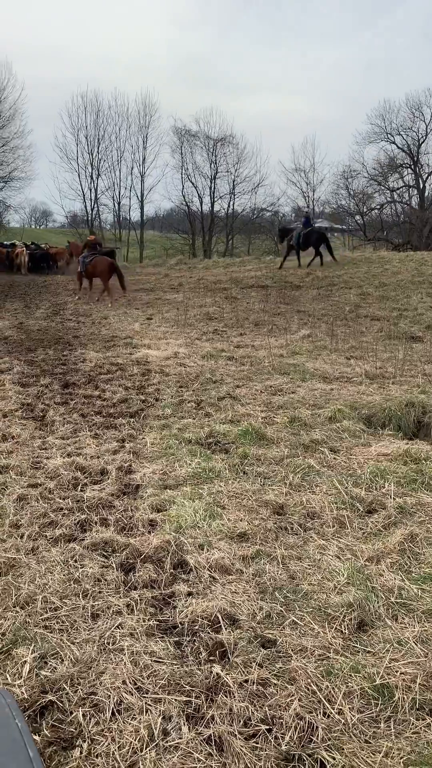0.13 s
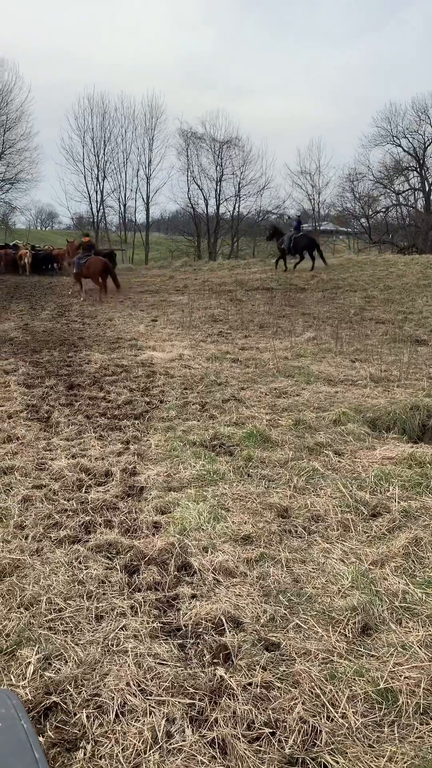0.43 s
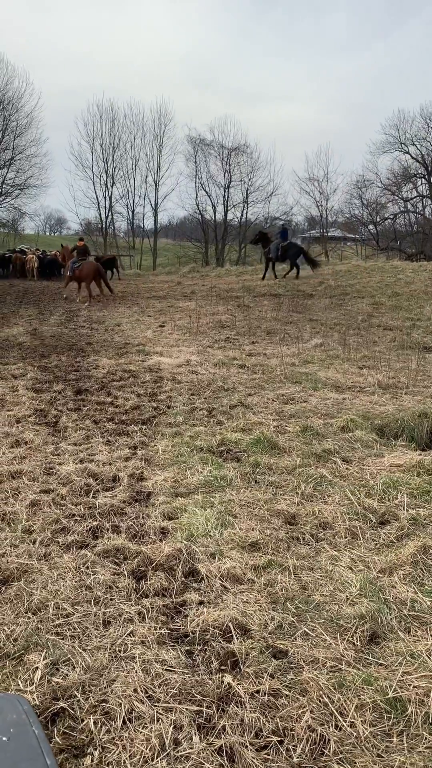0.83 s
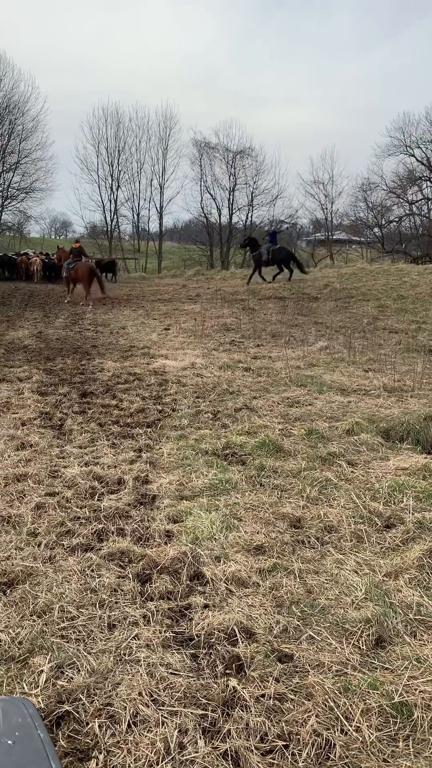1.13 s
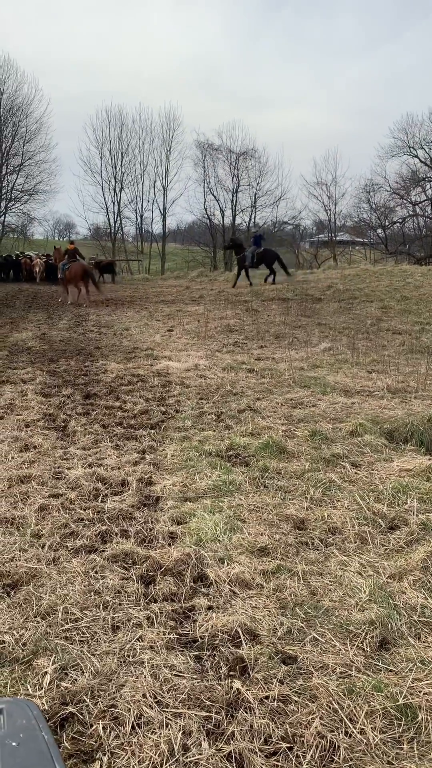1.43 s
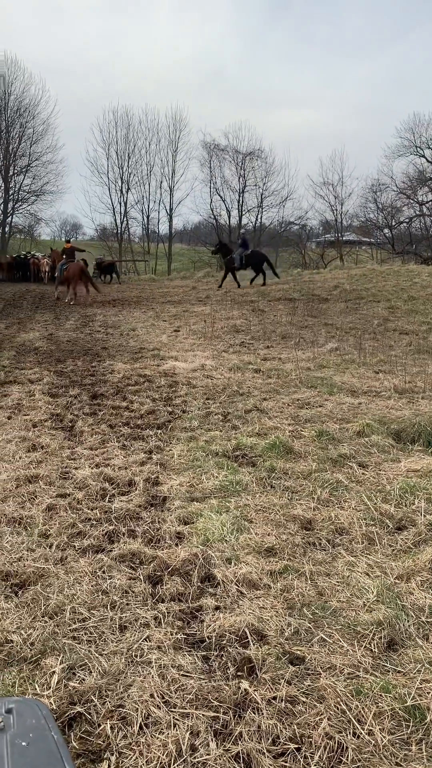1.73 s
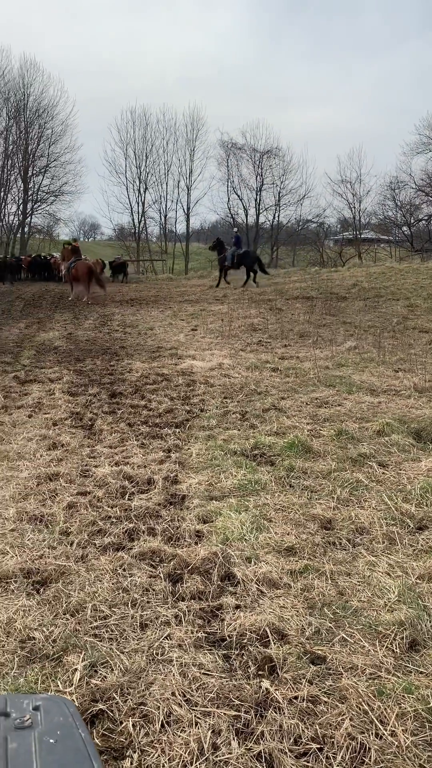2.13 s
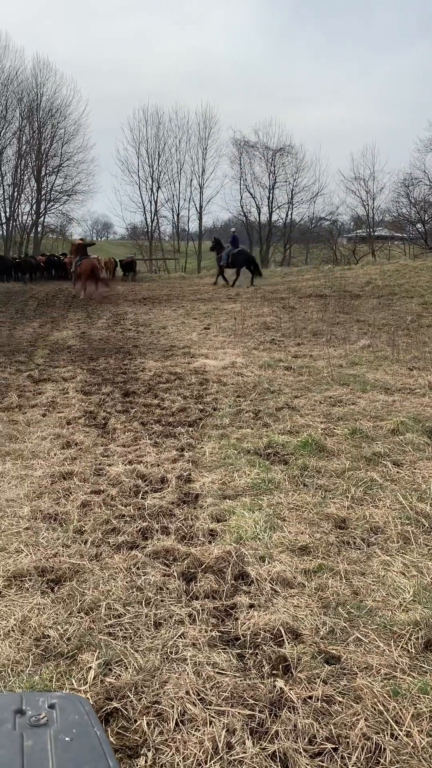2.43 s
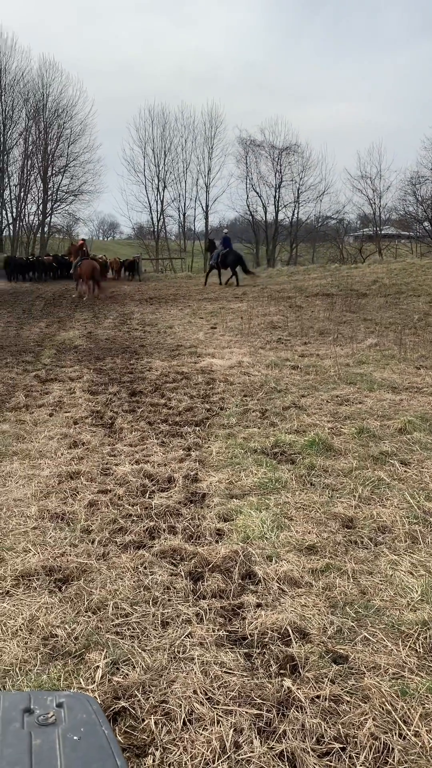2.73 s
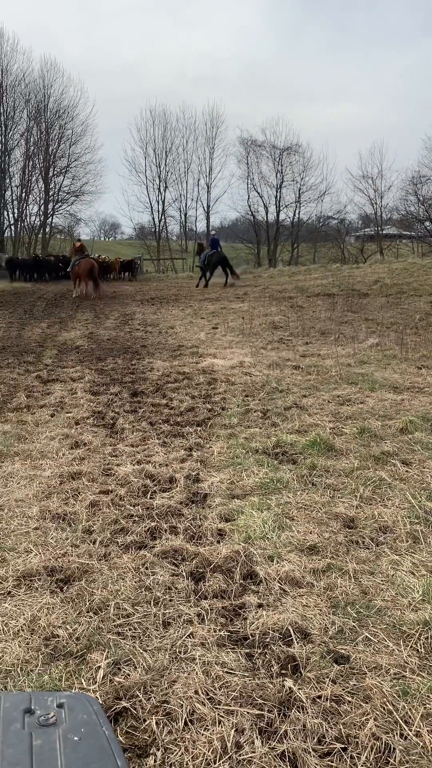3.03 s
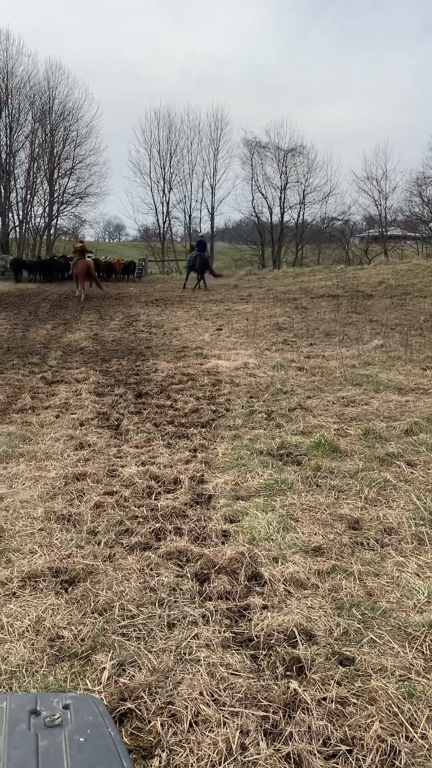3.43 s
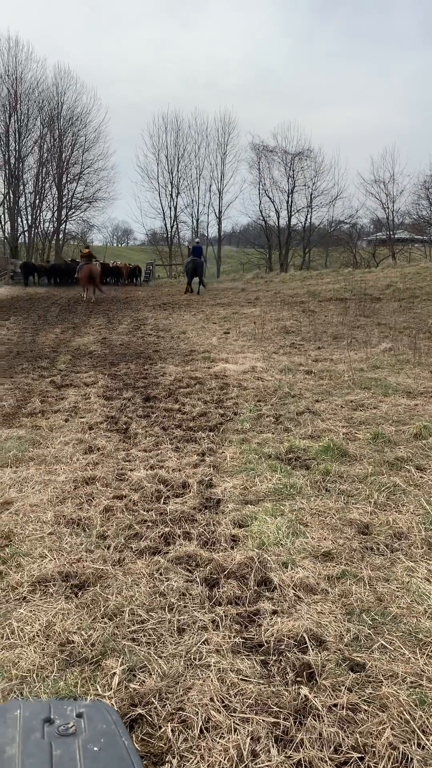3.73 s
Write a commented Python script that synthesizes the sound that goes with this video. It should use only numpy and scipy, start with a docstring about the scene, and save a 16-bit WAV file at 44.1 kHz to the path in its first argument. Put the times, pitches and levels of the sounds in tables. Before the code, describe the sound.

A long whip cracks twice in an open pasture, heard from some way off. Faint swishes at about 0.5 and 0.9 seconds lead to the first crack at 1.1 seconds. A sharper, brighter crack follows at 2.6 seconds. Each slaps back and rolls briefly off the trees. Faint swishes return after 3.4 seconds. Low wind rumble on the microphone, soft dry grass rustles and a faint hiss lie underneath.

```python
"""Whip cracks across a pasture

A long whip whistles through the air and cracks twice, heard from a phone some way off. Each crack is
a shock wave scattered by rough grass; it slaps back from near and far and rolls back from the tree
line. Underneath: ticks and rustles in dry grass, wind rumble on the microphone, hiss and a far hum."""
import sys
import numpy as np
from scipy import signal
from scipy.fft import rfft, irfft
from scipy.io import wavfile
from scipy.ndimage import uniform_filter1d

SR = 44100
rng = np.random.default_rng(int(sys.argv[2]) if len(sys.argv) > 2 else 0)


def to_wav(sig):
    """Store sig (one row per channel, or 1-D mono) as 16-bit WAV at the path in sys.argv[1].

    Samples outside -1..1 are clipped; the rate is SR.
    """
    pcm = np.clip(np.atleast_2d(sig), -1, 1) * 32767
    pcm = np.round(pcm).astype(np.int16)
    wavfile.write(sys.argv[1], SR, pcm.T)  # frames by channels


N = 171990
TIME, FREQ = np.arange(N) / SR, np.arange(N // 2 + 1) * SR / N

# The two hits. Each row: start in seconds, shock and scatter levels in dB, scatter hold and decay in
# seconds, bass and treble shelves in dB, bounce lag in seconds.
WHIP_CRACKS = [(1.0649, -35, -26, 0.0049, 0.0072, -0.5, -1.5, 0.00282),
               (2.6004, -13.5, -27.5, 0.0016, 0.0034, -2.5, 9, 0.0038)]
# Lighter snaps as the lash unrolls. Each row: start in seconds, level in dB, decay in seconds,
# treble shelf in dB.
LASH_SNAPS = [(1.041, -56.5, 0.036, 4), (2.562, -44.5, 0.0097, 3), (2.5798, -37.5, 0.0042, 17),
              (2.587, -38.5, 0.03, 0)]
# Weight under the cracks. Each row: start in seconds, level in dB, rise in seconds, pitch in Hz.
AIR_THUMPS = [(1.066, -34, 0.0031, 212), (2.561, -39, .008, 127)]
# The lash whistling. Each row: start and length in seconds, level in dB, first, middle, last pitch in Hz.
LASH_SWISHES = [(0.476, 0.033, -56.5, 1220, 1500, 1520), (0.494, 0.063, -54, 1490, 1268, 1210),
                (0.863, 0.088, -61.5, 973, 1106, 1090), (0.928, 0.17, -64.5, 921, 954, 960),
                (2.421, 0.033, -58, 1580, 1636, 1480), (3.398, 0.073, -66.5, 1230, 1446, 1800),
                (3.787, 0.1, -65, 1425, 1380, 1420)]
# Separate echoes, near and far. Each row: start in seconds, shock and scatter levels in dB,
# scatter hold and decay in seconds, treble shelf in dB.
SLAP_ECHOES = [(1.1001, -35, -28, 0.00093, 0.0027, -3), (1.108, -31, -28.5, 0.0057, 0.017, -2.5),
               (1.1748, -28, -25.5, 0.0013, 0.0056, -5.5), (1.2, -30, -34, 0.0039, 0.0027, -16),
               (1.2154, -19, -34, 0.004, 0.0026, -24), (2.635, -47, -37, 0.011, 0.014, 1.5),
               (1.558, -42, -54.5, 0.017, 0.049, -42), (2.6416, -19, -27.5, 0.00063, 0.0012, 2.5),
               (2.689, -53, -39, 0.02, 0.003, 1.5), (2.7613, -22, -37.5, 0.017, 0.01, -45),
               (2.85, -53, -45.5, 0.0072, 0.0073, -28)]
# One rolling echo per crack. Each row: start in seconds, level in dB, rise and hold in seconds,
# treble shelf in dB.
TREE_ECHOES = [(1.135, -34.5, 0.08, 0.014, -7.5), (2.673, -41, 0.024, 0.06, 3)]
# The tail among the trees. Each row: frequency in Hz, seconds to fall by 60 dB.
TREE_DECAY = [(300, 0.86), (1400, 0.84), (3500, 0.59), (7000, 0.53), (13000, 0.061)]
# Close ticks and rustles. Each row: start in seconds, level in dB, decay in seconds, centre in Hz.
STALK_TICKS = [(0.07, -45.5, 0.0013, 3500), (0.103, -66, 0.081, 7000), (0.53, -51.5, 0.0032, 1970),
               (0.532, -72.5, 0.082, 8200), (.559, -56, 0.0017, 2960), (2.457, -51.5, 0.0021, 3500),
               (3.325, -55, 0.0027, 730), (3.448, -65.5, 0.018, 3500), (3.706, -59.5, 0.013, 4040)]
# EQ curves of the layers. Each row: frequency in Hz, relative level in dB.
CRACK_EQ = [(60, -28), (130, 2.5), (230, -8.5), (450, -5.5), (1000, -4), (1450, 3), (2300, -7.5),
            (4100, -1.5), (5500, -13), (7500, -15), (11000, -26.5), (14000, -25.5)]
ECHO_EQ = [(100, -12), (350, -22), (650, -5), (950, -6.5), (1400, 4), (2300, 2.5), (4100, 2.5), (5500, -8),
           (7500, -4.5), (9700, -20), (12000, -15), (14500, -29)]
GRASS_EQ = [(400, -16.5), (1000, 13.5), (1700, 12.5), (4000, 3), (7500, -8), (13000, -25.5)]
WIND_EQ = [(20, -21.5), (35, -9.5), (60, 3), (90, -3.5), (140, -11), (350, -32.5), (2000, -89.5)]
HISS_EQ = [(100, -10), (300, 8.5), (560, 14), (750, 6), (1100, -13), (1600, -32.5), (4000, -15.5),
           (5200, -33.5), (6600, -3), (8500, -24), (13000, -16.5), (15000, -36.5)]
# Fader rides of the beds. Each row: time in seconds, level in dB.
GRASS_FADER = [(0, -76.5), (.4, -79.5), (.58, -72), (.8, -78), (1.6, -70.5), (1.95, -67.5), (2.15, -72),
               (2.5, -68.5), (3.15, -66), (3.38, -75.5), (3.6, -66.5), (3.76, -71.5), (3.9, -67)]
WIND_FADER = [(0, -53), (.14, -48), (.3, -51), (.52, -49), (.82, -50), (.95, -55), (1.2, -52), (1.8, -54),
              (1.93, -47), (2.2, -50), (2.36, -48), (2.41, -40), (2.46, -51), (3.15, -55), (3.7, -53),
              (3.85, -45), (3.9, -49)]
HUM_FADER = [(0, -77.5), (2.9, -71), (3.2, -64), (3.7, -70.5)]
# The phone's two microphone ports. Each row: frequency in Hz, lag of the right in radians,
# unrelated share from 0 to 1, sensitivity to direction from 0 to 1.
MIC_PORTS = [(280, 0, .002, .01), (650, .05, .2, .7), (1500, .15, .08, .6), (2500, .9, .4, 1),
             (4200, 1.0, .42, 1), (5100, 3.2, .48, .8), (6000, 5.4, .33, .1), (6900, 6.3, .04, 0),
             (7600, 6.6, .15, 0), (9700, 9.4, .05, 0), (11000, 11.0, .45, 0), (12300, 12.6, .1, 0),
             (13600, 13.2, .5, 0)]
LAG, UNRELATED, DIRECTION = 1, 2, 3  # its columns

SHOCK_S, ATTACK_S = .0002, .0007
BOUNCE_DB, BOUNCE_HZ = -8, 3500
WASH_DB, WASH_DECAY_S = -10, 0.044
TRUNKS_PER_S, TRUNK_DB = 500, -5
TREE_FLUTTER_DB, CLUMP_DB = -1.2, 1.5
TWIG_SPREAD_DB, STALK_SPREAD_DB = 2, 2.4
SWISH_WIDTH_HZ = 240
HISS_DB, HUM_HZ, HUM_WIDTH_HZ = -69, 549, 73
CRACK_PAN_DB, ECHO_PAN_DB = -5, -2  # negative leans right
BASS_HZ, TREBLE_HZ, TOP_HZ = 500, 4860, 14200


def whip():
    """The tip breaks the sound barrier; the ground smears the shock into a short burst and a weak wash."""
    out = 0
    for start, shock_db, db, hold, decay, bass_db, treble_db, lag in WHIP_CRACKS:
        burst = shock(start, shock_db) + amp(db) * envelope(start, hold, decay) * grains()
        wash = amp(db + WASH_DB) * envelope(start, 0, WASH_DECAY_S) * grains(TWIG_SPREAD_DB)
        out += colour(bounce(burst, lag), CRACK_EQ, bass_db, treble_db)
        out += colour(wash, ECHO_EQ, 0, treble_db)
    for start, db, decay, treble_db in LASH_SNAPS:
        snap = amp(db) * envelope(start, 0, decay) * grains()
        out += colour(snap, CRACK_EQ, 0, treble_db)
    return pan(out, CRACK_PAN_DB)


def shock(start, db):
    """The hard front of a crack: an N-shaped pressure wave."""
    ramp = 2 * (TIME - start) / SHOCK_S - 1
    gate = np.clip((1 - abs(ramp)) * SHOCK_S * SR / 2 + .5, 0, 1)
    return -ramp * gate * amp(db)


def bounce(x, lag):
    """A second, duller path a few milliseconds longer makes the sound hollow."""
    late_path = amp(BOUNCE_DB) * np.exp(-2j * np.pi * FREQ * lag) / (1 + (FREQ / BOUNCE_HZ) ** 2)
    return irfft(rfft(x) * (1 + late_path), N)


def thumps():
    """The lash shoves the air aside with a short low thud."""
    out = 0
    for start, db, rise, hz in AIR_THUMPS:
        age = np.maximum(TIME - start, 0)
        punch = amp(db) * age / rise * np.exp(1 - age / rise)
        out += punch * np.sin(2 * np.pi * hz * age)
    return out


def swishes():
    """Air whistles round the lash: a narrow band of noise that glides in pitch."""
    out = 0
    for start, length, db, *pitches in LASH_SWISHES:
        progress = np.clip((TIME - start) / length, 0, 1)
        hz = np.interp(progress, [0, .5, 1], pitches)
        phase = 2 * np.pi * np.cumsum(hz) / SR
        noise = rfft(rng.standard_normal((2, N)))
        eddies = unit(irfft(noise / (1 + (2 * FREQ / SWISH_WIDTH_HZ) ** 2), N))
        whistle = eddies[0] * np.cos(phase) + eddies[1] * np.sin(phase)
        out += amp(db) * np.sin(np.pi * progress) * whistle
    return pan(out, ECHO_PAN_DB)


def slaps():
    """Separate echoes of the crack: quick ones from nearby and later, duller ones from far off."""
    out = 0
    for start, shock_db, db, hold, decay, treble_db in SLAP_ECHOES:
        scatter = amp(db) * envelope(start, hold, decay) * grains(TWIG_SPREAD_DB)
        out += colour(shock(start, shock_db) + scatter, ECHO_EQ, 0, treble_db)
    return pan(out, ECHO_PAN_DB)


def tree_line():
    """Tiny echoes off trunks and twigs arrive in clumps, swell and die away, the treble first."""
    out = 0
    octaves_hz = 250 * 2. ** np.arange(7)
    for (start, db, rise, hold, treble_db), (*_, lag) in zip(TREE_ECHOES, WHIP_CRACKS):
        twigs = grains(TWIG_SPREAD_DB)
        trunks = amp(TRUNK_DB) * grains(per_s=TRUNKS_PER_S)
        wood = unit(bounce(twigs + trunks, lag))
        clumps = amp(TREE_FLUTTER_DB * wander(250) + CLUMP_DB * wander(70))
        echoes = rfft(colour(wood * clumps, ECHO_EQ, 0, treble_db))
        swell = amp(db) * np.clip((TIME - start) / rise, 0, 1)
        age = np.maximum(TIME - start - rise - hold, 0)
        for hz in octaves_hz:
            crossover = on_log(list(zip(octaves_hz, octaves_hz == hz)), FREQ)
            tail = amp(-60 * age / on_log(TREE_DECAY, hz))
            out += irfft(echoes * crossover, N) * swell * tail
    return pan(out, ECHO_PAN_DB)


def grass():
    """Dry stalks rustle and now and then tick."""
    rustle = colour(grains(STALK_SPREAD_DB), GRASS_EQ) * fader(GRASS_FADER, 2 * wander(26))
    ticks = sum(amp(db) * envelope(start, 0, decay) * band(grains(STALK_SPREAD_DB), hz, 0.97 * hz)
                for start, db, decay, hz in STALK_TICKS)
    return rustle + ticks


def background():
    """The bed: wind buffeting both ports alike, a wavering far hum and open-air hiss."""
    buffet_db, waver_db, breeze_db = 1.5 * wander(30), 2 * wander(7), 1.2 * wander(6)
    rumble = colour(rng.standard_normal(N), WIND_EQ) * fader(WIND_FADER, buffet_db)
    hum = band(grains(), HUM_HZ, HUM_WIDTH_HZ) * fader(HUM_FADER, waver_db)
    hiss = colour(grains(), HISS_EQ) * amp(HISS_DB + breeze_db)
    return rumble + hum + hiss


def grains(spread_db=0, per_s=SR):
    """Stereo noise from arrivals of uneven size: alike in the bass, partly unrelated higher up."""
    arrivals = rng.standard_normal((2, N)) * (rng.random(N) < per_s / SR)
    sizes = amp(spread_db * rng.exponential(size=N))
    mid, side = rfft(unit(arrivals * sizes))
    share = ports(UNRELATED) / 2
    return irfft(mid * np.sqrt(1 - share) + side * np.sqrt(share) * np.array([[1], [-1]]), N)


def colour(x, curve, bass_db=0, treble_db=0):
    """An EQ curve scaled to unit power, then a shelf at each end."""
    db = on_log(curve, FREQ)
    db -= 10 * np.log10(np.mean(amp(db) ** 2))
    db += bass_db / (1 + (FREQ / BASS_HZ) ** 4)
    db += treble_db * (1 - 1 / (1 + (FREQ / TREBLE_HZ) ** 4))
    # Minimum phase, so nothing rings ahead of a hit.
    cepstrum = irfft(np.log(amp(db)), N)
    cepstrum[1:N // 2] *= 2
    cepstrum[N // 2 + 1:] = 0
    return irfft(rfft(x) * np.exp(rfft(cepstrum)), N)


def band(x, hz, width_hz):
    """A resonant band-pass, its output at rms 1."""
    detuning = (FREQ ** 2 - hz ** 2) / ((FREQ + 1) * width_hz)
    return unit(irfft(rfft(x) / (1 + detuning ** 2), N))


def envelope(start, hold, decay):
    """Quick swell up to the start, hold, exponential release."""
    return np.exp(np.minimum(TIME - start, 0) / ATTACK_S - np.maximum(TIME - start - hold, 0) / decay)


def fader(ride, wobble_db):
    """Gain along a fader ride, with a wobble on top."""
    return amp(np.interp(TIME, *np.array(ride).T) + wobble_db)


def wander(per_s):
    """Smooth random modulation of rms 1."""
    step = max(int(SR / per_s), 2)
    stairs = rng.standard_normal(N)[np.arange(N) // step]
    return unit(uniform_filter1d(uniform_filter1d(stairs, step), step))


def pan(x, pan_db):
    """A sound from one side is louder at that port, mostly in the midrange."""
    return irfft(rfft(x) * amp(ports(DIRECTION) * np.array([[pan_db], [-pan_db]]) / 2), N)


def ports(column):
    """One column of the port table at every frequency."""
    return on_log(np.array(MIC_PORTS)[:, [0, column]], FREQ)


def on_log(curve, hz):
    """Read a curve along a log frequency axis."""
    points_hz, values = np.array(curve).T
    return np.interp(np.log(hz + 1), np.log(points_hz), values)


def amp(db):
    """Decibels to gain."""
    return 10 ** (np.asarray(db) / 20)


def unit(x):
    """Scale to rms 1."""
    return x / np.sqrt(np.mean(x ** 2))


def scene():
    """The mix: whip, echoes and pasture."""
    return whip() + thumps() + slaps() + tree_line() + swishes() + grass() + background()


def record(dry):
    """The phone's right channel lags in phase more and more towards the treble; the top is cut."""
    phase_shift = np.exp(1j * ports(LAG) * np.array([[1], [-1]]) / 2)
    stereo = irfft(rfft(dry) * phase_shift, N)
    high_cut = signal.ellip(8, .2, 70, TOP_HZ, fs=SR, output="sos")
    return signal.sosfilt(high_cut, stereo)


dry = scene()
out = record(dry)
to_wav(out)
```